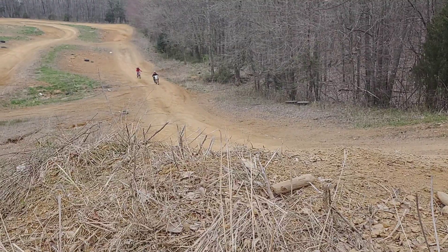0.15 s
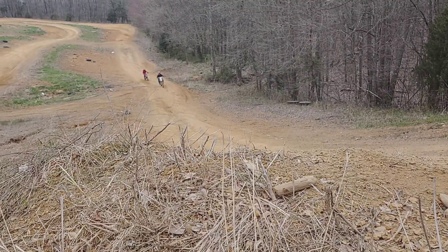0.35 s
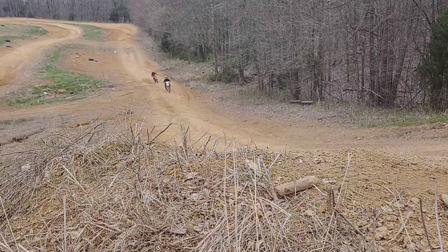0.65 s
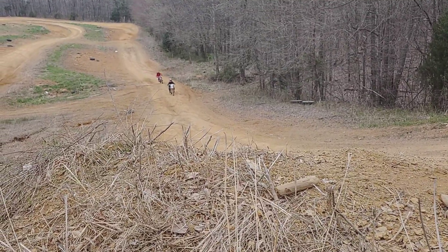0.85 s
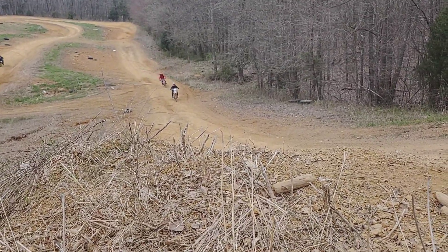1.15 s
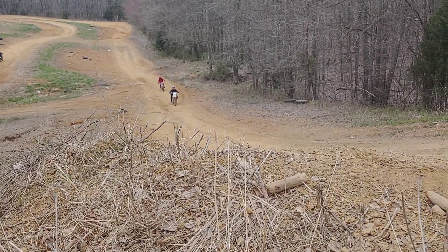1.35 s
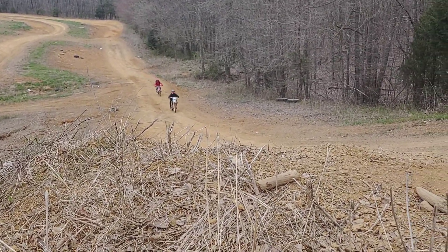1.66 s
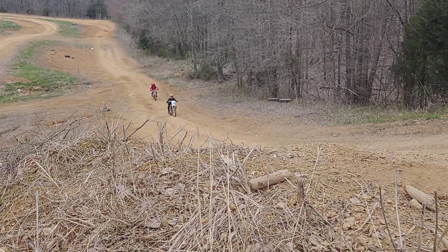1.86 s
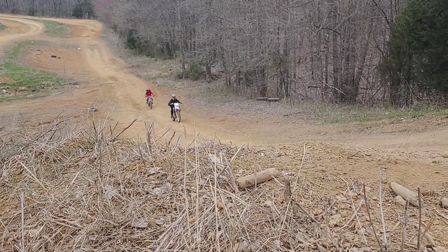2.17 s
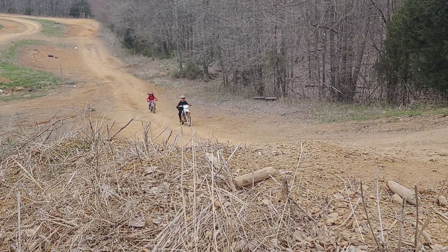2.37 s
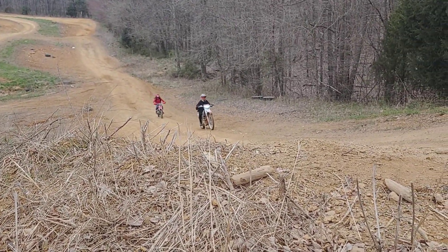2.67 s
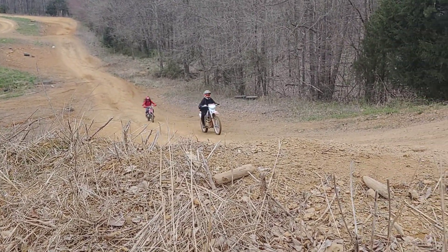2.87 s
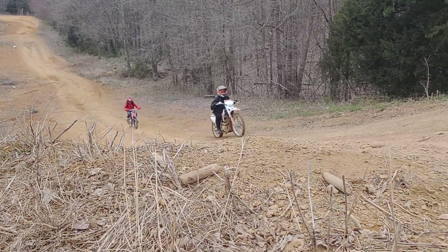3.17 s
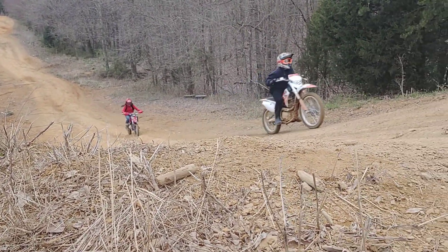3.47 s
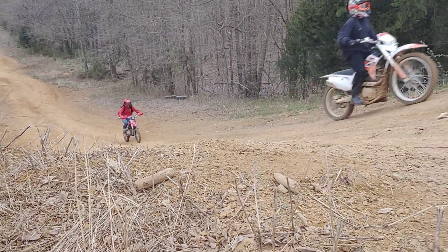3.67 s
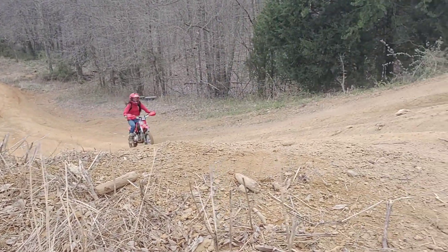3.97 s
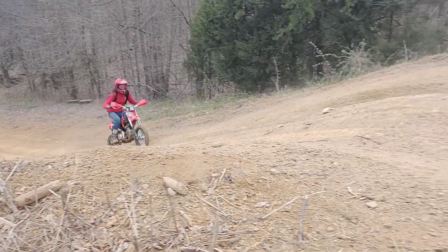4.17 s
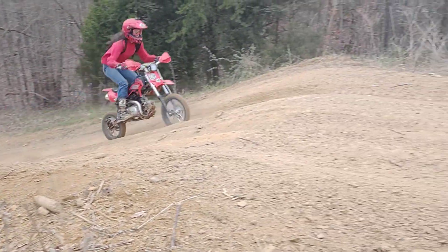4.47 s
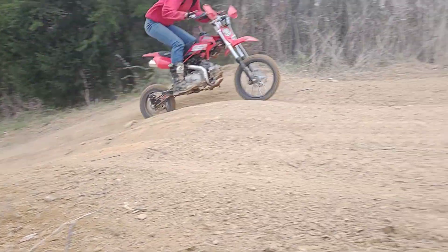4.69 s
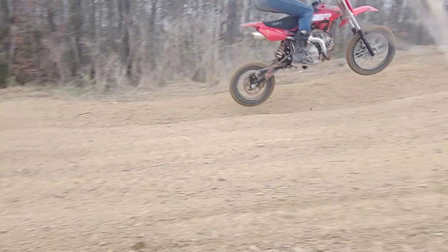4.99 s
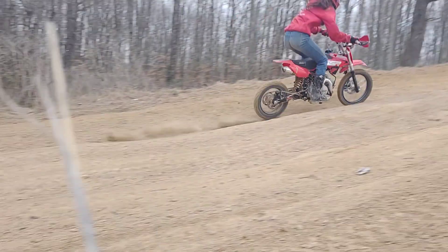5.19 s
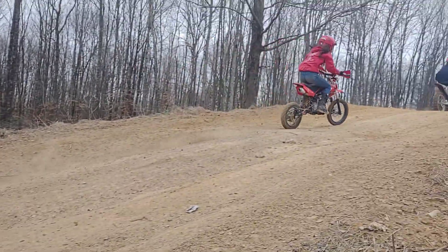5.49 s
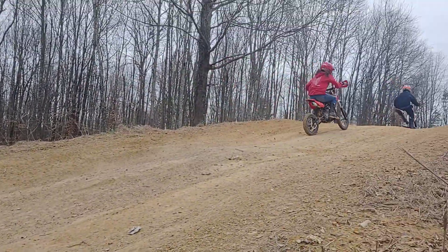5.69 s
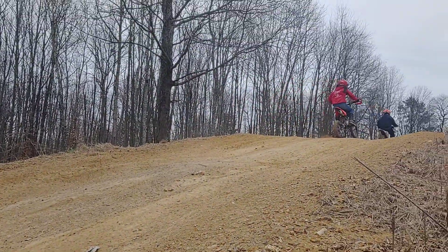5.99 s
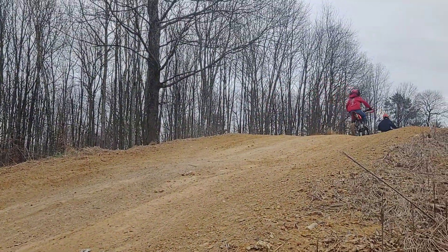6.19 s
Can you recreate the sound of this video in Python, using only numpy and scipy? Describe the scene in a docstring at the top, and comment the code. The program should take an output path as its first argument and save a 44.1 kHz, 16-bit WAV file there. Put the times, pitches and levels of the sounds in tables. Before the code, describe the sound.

A dirt bike drones closer at speed and drops its throttle over a jump, then a smaller, raspier bike follows past outdoors.

```python
"""Two single-cylinder four-stroke dirt bikes ride up a track beside a wood and pass left to right.
The leader pulls at high speed, each firing ringing its pipe and echoing off the trunks; from 0.7 s a
third, distant bike thuds along. At 3.8 s the leader shuts the throttle, rattles over a jump with chain
and tyres hissing, and burbles away. A small pit bike follows, revs up in the air (4.6-5.2 s), lands and
putters off with sharp, rasping exhaust pops."""
import sys
import numpy as np
from scipy import signal
from scipy.fft import rfft, irfft
from scipy.io import wavfile
from scipy.ndimage import uniform_filter1d, map_coordinates

SR = 44100
rng = np.random.default_rng(int(sys.argv[2]) if len(sys.argv) > 2 else 0)


def master(y):
    """Save y as 16-bit WAV."""
    cut = np.clip(np.atleast_2d(y).T, -1, 1)
    pcm = np.round(cut * 32767)  # scale
    wavfile.write(sys.argv[1], SR, pcm.astype(np.int16))


N = 279814
T = np.arange(N) / SR
SHUT_S = 3.79  # leader shuts the throttle

# exhaust spectra, distant pop and soft thud: f/Hz, level/dB
FAR_POP_SPECTRUM = [(60, -32.5), (130, 3.5), (200, 0.5), (290, -6), (390, 2), (520, -4.5), (650, -12),
                    (800, -16), (1000, -18), (1400, -38.5)]
THUD_SPECTRUM = [(40, -51.5), (70, -0.5), (100, 11.5), (150, 8), (200, 7.5), (260, -1), (350, -6.5),
                 (450, -12), (700, -10.5), (1500, -28.5)]


def from_db(db):
    """Level to amplitude."""
    return 10 ** (np.asarray(db) / 20)


def in_time(rows):
    """Each column of a time table at every sample."""
    times_s, *columns = np.transpose(rows)
    return [np.interp(T, times_s, column) for column in columns]


def ramp(at_s, length_s):
    """Linear rise from 0 to 1, centred on at_s."""
    return np.clip(.5 + (T - at_s) / length_s, 0, 1)


def fading(db, from_s, db_per_s):
    """Level in dB: holds, then falls steadily."""
    return db - db_per_s * np.maximum(T - from_s, 0)


def swell(at_s, peak_db, width_s):
    """Gain of a brief Gaussian swell."""
    return from_db(peak_db) * np.exp(-.5 * ((T - at_s) / width_s) ** 2)


def passing(at_s, peak_db, width_s):
    """Gain of a source riding past: 1/distance."""
    return from_db(peak_db) / np.hypot(1, (T - at_s) / width_s)


def at_level(x, db, size=2400):
    """Holds the RMS level, averaged over several firings."""
    power = uniform_filter1d(uniform_filter1d(x.mean(axis=0) ** 2, size), size)
    return x * from_db(db) / np.sqrt(np.abs(power) + 1e-6 * power.mean())


def delayed(x, delay_s):
    """Fixed or moving delay; negative is earlier."""
    return np.array([map_coordinates(side, [(T - delay_s) * SR], order=3) for side in np.atleast_2d(x)])


def colour(x, spectrum, size=4096):
    """Minimum-phase filter: a click rings on with the given spectrum."""
    hz, db = np.transpose(spectrum)
    grid_hz = np.maximum(np.arange(size // 2 + 1) * SR / size, 1)
    log_gain = np.log(from_db(np.interp(np.log(grid_hz), np.log(hz), db)))
    log_gain -= 2 * np.log(np.maximum(grid_hz / hz[-1], 1)) + np.log(np.clip(hz[0] / grid_hz, 1, 20))
    cepstrum = irfft(log_gain)
    cepstrum[1:size // 2] *= 2
    cepstrum[size // 2 + 1:] = 0
    response = irfft(np.exp(rfft(cepstrum)))
    return signal.oaconvolve(np.atleast_2d(x), response[None], axes=1)[:, :N]


def turning(x, spectrum, share):
    """Blends a sound into its colour from another angle."""
    return (1 - share) * x + share * colour(x, spectrum)


def resonance(x, hz, width_hz):
    """One fixed mode, rung by each pulse."""
    r = np.exp(-np.pi * width_hz / SR)
    return signal.lfilter([1, 0, -1], [1, -2 * r * np.cos(2 * np.pi * hz / SR), r * r], x + 1e-18)


def gliding(x, hz, width_hz):
    """Steep-sided resonance with a moving centre."""
    r = np.exp(-np.pi * width_hz / SR)
    carrier = np.exp(2j * np.pi * np.cumsum(hz) / SR)
    baseband = signal.lfilter([1 - r], [1, -2 * r, r * r], x / carrier + 1e-18)
    return np.atleast_2d((baseband * carrier).real)


def stereo_noise(alike):
    """White noise with left-right correlation `alike`."""
    return np.sqrt(alike) * rng.standard_normal(N) + np.sqrt(1 - alike) * rng.standard_normal((2, N))


def firings(speed, uneven_db, jitter_s, bumps_s=0):
    """One click per power stroke, uneven in strength and timing; bumps sway the timing slowly."""
    cycles = np.cumsum(in_time(speed)[0]) / SR
    cycles -= np.interp(speed[0][0], T, cycles)
    starts = np.flatnonzero(np.diff(np.floor(cycles)))
    timing, strength, bumps = rng.standard_normal((len(starts), 3)).T
    sway = uniform_filter1d(uniform_filter1d(bumps, size=7), size=7)
    late_s = timing * np.broadcast_to(jitter_s, N)[starts] + bumps_s * sway / sway.std()
    clicks = np.zeros(N)
    clicks[np.clip(starts + (late_s * SR).astype(int), 0, N - 1)] = from_db(uneven_db * strength)
    return clicks


def crackling(clicks, spread_db=1.6):
    """Gas puffs vary in strength from firing to firing."""
    return clicks * from_db(spread_db * rng.standard_normal(N))


def gas_jet(clicks, puff_s, leak, alike):
    """A puff of turbulence per click, as from an opening exhaust valve, over a steady leak."""
    r = np.exp(-1 / (puff_s * SR))
    puff = signal.lfilter([np.e / (puff_s * SR)], [1, -2 * r, r * r], clicks + 1e-18)
    return (delayed(puff, -puff_s) + leak) * stereo_noise(alike)


def blowdown(clicks, hiss_db, leak):
    """The cylinder empties: each firing whistles down the treble in a few ms, over a puff of gas."""
    from_hz, to_hz, fall_s = 16000, 1589, .0011
    age_s = T[:SR // 100]
    whistles = np.zeros((2, N + len(age_s)))
    for start in np.flatnonzero(clicks):
        slide = np.exp(-age_s / (fall_s * np.exp(.2 * rng.standard_normal())))
        hz = to_hz + (from_hz - to_hz) * slide
        eddies = uniform_filter1d(rng.standard_normal((2, len(age_s))), size=16)
        flutter = 1 + .4 * (eddies[0] + 1j * eddies[1]) / eddies.std()
        phase_rad = 2 * np.pi * (np.cumsum(hz) / SR + rng.random()) + .7 * rng.standard_normal((2, 1))
        envelope = clicks[start] * np.sqrt(slide * (1 - slide ** 10))
        whistles[:, start:start + len(age_s)] += envelope * (flutter * np.exp(1j * phase_rad)).real
    hiss = at_level(gas_jet(clicks, puff_s=0.001, leak=leak, alike=0.23), hiss_db)
    return at_level(delayed(whistles[:, :N], -.0016), 0) + hiss


def air_noise():
    """Low air noise, dying down as the bikes pass."""
    spectrum = [(25, -7), (45, -15), (80, -3), (150, -3), (400, -9), (1500, -22.5), (8000, -54)]  # f/Hz, level/dB
    return at_level(colour(stereo_noise(0.8), spectrum), fading(-33, from_s=3.72, db_per_s=3.5))


def woods(x, t60_s, alike, places=5):
    """Dense echoes off the trunks; the pattern changes as the bike moves."""
    echoes, length = 0, int(t60_s * SR)
    for place_s in np.linspace(0, SHUT_S, places):
        tail = stereo_noise(alike)[:, :length] * from_db(-60 * T[:length] / t60_s)
        tail /= np.sqrt(np.sum(tail ** 2) / 2)
        near = np.sqrt(np.clip(1 - np.abs(T - place_s) * (places - 1) / SHUT_S, 0, 1))
        echoes = echoes + signal.oaconvolve(x * near, tail, axes=1)[:, :N]
    return echoes


def third_bike():
    """Far off and facing away: only low thuds carry, louder as it revs."""
    speed = [(.65, 54.5), (1.12, 48.7), (1.2, 52.7), (1.52, 59), (1.72, 46), (2.05, 50)]  # t/s, firing rate/Hz
    clicks = firings(speed, uneven_db=3.0, jitter_s=.0001)
    revs_db = 0.6 * (in_time(speed)[0] - np.mean(speed, axis=0)[1])
    thuds = colour(resonance(clicks, hz=73, width_hz=430), THUD_SPECTRUM)
    return at_level(thuds, fading(-25, from_s=2.16, db_per_s=20) + revs_db) * ramp(0.66, 0.31)


def running_gear():
    """Chain and tyre hiss, dulled by distance; the leader's metal rattles over the jump."""
    passes = [(3.931, -26, 0.35), (4.92, -27.5, 0.31)]  # leader, pit bike: t/s, peak level/dB, half-width/s
    # hiss, its far-off filter, modes of chain, sprockets and casings: f/Hz, level/dB
    hiss_spectrum = [(600, -23), (1500, -8.5), (2250, -14), (2750, -2), (4000, -5), (6200, -7), (7500, -6),
                     (9000, -11.5), (15500, -19)]
    far_air = [(1000, 7), (6500, -2), (9000, -5), (15000, -12)]
    metal_modes = [(3030, 2), (4920, 3), (7250, -5)]
    leader, pit = (passing(*row) for row in passes)
    behind_jump = from_db(-28.5 * ramp(4.38, 0.38))
    brief_dip = 1 - swell(at_s=3.57, peak_db=-12, width_s=.06)
    gain = np.hypot(leader * behind_jump, pit) * brief_dip
    ticks = (rng.random(N) < 160 / SR) * rng.exponential(1, N)
    grit = gas_jet(ticks, puff_s=0.00082, leak=1.87, alike=0.074)
    hiss = at_level(colour(grit, hiss_spectrum), 0)
    near = ramp(2.46, 0.99)
    hiss = near * hiss + (1 - near) * colour(hiss, far_air)
    rattle = at_level(sum(from_db(db) * resonance(grit, hz, width_hz=110) for hz, db in metal_modes), 0)
    return gain * hiss + swell(at_s=3.9, peak_db=-31, width_s=.12) * rattle


def casings(leader_clicks, pit_clicks):
    """Firings knock two rough, sinking rings out of the casings: the leader's, then the pit bike's."""
    modes = [(3.8, 960, 1160), (4.3, 960, 1130), (4.65, 834, 1010)]  # t/s, lower f/Hz, upper f/Hz
    handover = ramp(3.98, 0.49)
    knocks = (1 - handover) * leader_clicks + handover * pit_clicks
    early = delayed(knocks, -0.00175)
    rattle = gas_jet(knocks, puff_s=0.002, leak=0.11, alike=0.58)
    rings = sum(at_level(gliding(early, hz, width_hz=170), 0)
                + at_level(gliding(rattle, hz, width_hz=170), -4) for hz in in_time(modes))
    audible = ramp(SHUT_S, 0.11) * (1 - ramp(4.6, 0.3))
    return at_level(rings, fading(-26, from_s=SHUT_S, db_per_s=11)) * audible


def engine_ticks(clicks, gain):
    """A short bright snap per firing, heard only close by."""
    spectrum = [(1500, -30), (3000, 2), (4500, -2.5), (7000, 5), (9000, -2.5), (15500, -7.5)]  # f/Hz, level/dB
    return gain * at_level(colour(blowdown(clicks, hiss_db=1.5, leak=0.034), spectrum), 0)


def pit_bike(clicks):
    """A pressure pop and a whistling snap per firing; echoes off the dirt sweep notches through them."""
    levels = [(4.48, -41, -34), (4.7, -29, -30), (4.85, -26, -22), (5.17, -30, -23.5), (5.32, -28, -28),
              (5.7, -27.5, -25.5), (6.08, -28.5, -28), (6.34, -28, -26)]  # t/s, pop level/dB, rasp level/dB
    ground_notch = [(4.45, 1400), (4.68, 890), (4.85, 850), (5.0, 710), (5.18, 666), (5.33, 1200),
                    (5.52, 1060), (5.7, 1210), (6.34, 1170)]  # ground echo, lagging with height: t/s, first notch f/Hz
    face_peak = [(4.66, 626), (4.84, 530), (4.97, 423), (5.16, 415)]  # longer echo, likely off the jump face: t/s, first peak f/Hz
    # exhaust spectra and their change with angle: f/Hz, level/dB
    pop_spectrum = [(80, -21.5), (115, -2.5), (160, -5), (260, 6.5), (400, 0.5), (550, 2.5), (850, 1.5),
                    (1200, 0), (2000, -8.5), (4000, -10)]
    rasp_spectrum = [(500, -40), (1300, -4.5), (2000, -8), (2900, 5.5), (4000, -0.5), (6500, 2.5),
                     (8500, -1), (12000, -8.5), (15500, -11)]
    airborne = [(110, 13.5), (220, 6), (400, 4), (620, 4.5), (900, 5), (1300, 1.5), (1750, -3), (2300, -15)]
    from_behind = [(130, -15), (250, 4.5), (600, -0.5), (1020, 18.5), (1500, -1.5), (2100, 0), (3100, -15),
                   (4700, 8), (7000, -7)]
    take_off_s, landing_s = 4.6, 5.23
    pop_db, rasp_db = in_time(levels)
    ground_s, face_s = .5 / in_time(ground_notch)[0], 1 / in_time(face_peak)[0]
    flying = ramp(take_off_s, 0.12) * (1 - ramp(landing_s, 0.15))
    leaving = ramp(6.33, 0.65)

    pop = at_level(colour(delayed(clicks, -0.001293), pop_spectrum), 0)
    puff = at_level(colour(gas_jet(clicks, puff_s=0.001, leak=0.18, alike=0.85), pop_spectrum), -9)
    pop = turning(turning(pop + puff, airborne, flying), from_behind, leaving)
    pop = pop + 0.63 * flying * delayed(pop, face_s)
    pop = at_level(pop + 0.84 * delayed(pop, ground_s), pop_db)

    rasp = colour(blowdown(crackling(clicks, spread_db=0.6), hiss_db=-2.5, leak=0.1), rasp_spectrum)
    rasp = rasp + 0.39 * flying * delayed(rasp, face_s)
    rasp = at_level(turning(rasp, from_behind, leaving), rasp_db)
    ticks = engine_ticks(clicks, swell(at_s=4.49, peak_db=-27.5, width_s=0.29))
    return (pop + rasp + ticks) * ramp(3.9, 0.35)


def leader_coasting(clicks):
    """Shut throttle: deep thuds darken and fade, burble once on landing, then putter away faintly."""
    landing = swell(at_s=4.73, peak_db=-29, width_s=0.05)
    gain = from_db(fading(-14.5, from_s=3.75, db_per_s=17)) + landing
    hollow = at_level(gliding(clicks, hz=440 - 230 * ramp(4.03, 0.33), width_hz=160), -11)
    thud = at_level(colour(delayed(clicks, -0.00093), THUD_SPECTRUM), 0)
    putter = at_level(colour(crackling(clicks), FAR_POP_SPECTRUM), -40)
    gone = ramp(4.89, 1.0)
    return (1 - gone) * gain * (thud + hollow) * ramp(SHUT_S, 0.17) + gone * putter


def exhaust_rings(clicks):
    """Two pipe resonances, standing out as the leader nears."""
    modes = [(1.7, 1130, -38, 2009, -45), (2.4, 1230, -32.5, 2120, -34), (3.05, 1190, -24.5, 1994, -33.5),
             (3.45, 1203, -26.5, 1700, -36), (3.75, 1130, -29.5, 1660, -35.5)]  # t/s, lower f/Hz, level/dB, upper f/Hz, level/dB
    low_hz, low_db, high_hz, high_db = in_time(modes)
    early = delayed(clicks, -0.00072)
    lower = at_level(gliding(early, low_hz, width_hz=177), low_db)
    upper = at_level(gliding(early, high_hz, width_hz=400), high_db)
    return lower + upper


def hard_pops(decay_s):
    """Single hard exhaust pops under acceleration: gas bursts, each with its own ring."""
    pops = [(0.548, -12, 2900), (0.691, -8.5, 2980), (0.955, -18, 3300), (0.972, -23.5, 7170),
            (1.253, -15.5, 2950), (1.27, -22, 6160)]  # t/s, peak level/dB, ring f/Hz
    track, age_s = np.zeros((2, N)), T[:SR // 20]
    for at_s, peak_db, hz in pops:
        gas = rng.standard_normal(len(age_s)) + 0.72 * rng.standard_normal((2, len(age_s)))
        gas *= np.exp(-age_s / decay_s)
        burst = resonance(resonance(gas, hz, width_hz=690), hz, width_hz=690)
        start = int(at_s * SR)
        track[:, start:start + len(age_s)] += from_db(peak_db) * burst / np.abs(burst.mean(axis=0)).max()
    return track


def leader_pulling(clicks):
    """Open throttle: pressure spikes ring the pipe, each with a puff of gas; trees scatter a share."""
    levels = [(0.37, -21, -20.5), (0.57, -25, -20.5), (0.8, -21.5, -21.5), (1.05, -22.5, -18),
              (1.65, -19, -24), (2.3, -28, -21), (2.95, -17.5, -19.5), (3.55, -24, -25.5),
              (3.76, -19.5, -21.5)]  # t/s, boom relative level/dB, pop relative level/dB
    # exhaust spectra and their change with angle: f/Hz, level/dB
    pop_spectrum = [(60, -16), (130, 5.5), (190, 2), (270, -10), (380, 5), (470, -1.5), (580, 4),
                    (690, 1.5), (820, 3.5), (950, -2.5), (1300, -9.5), (2500, -41.5)]
    bark_spectrum = [(300, -34.5), (700, -2.5), (1000, 5), (1420, 4.5), (1650, -3.5), (2330, -8),
                     (2600, 1.5), (2850, -6.5), (3150, -10), (3420, -10), (3700, -46.5)]
    rasp_spectrum = [(700, -29), (1750, 7), (2300, -1.5), (2900, 1), (3700, -2.5), (7000, -9.5),
                     (8700, -32), (16000, -91)]
    crack_spectrum = [(700, -28), (1700, 4.5), (2200, 1.5), (2900, 1), (4200, -2), (6600, -1.5),
                      (8600, -18), (15000, -32)]
    head_on = [(130, -2.5), (250, 4.5), (400, 0), (600, -2.5), (800, -4)]
    broadside = [(300, -11.5), (450, 6), (640, -7.5), (850, -2), (1420, 8), (2200, -7), (2700, 4.5)]
    facing_until_s, bark_full_s = 0.745, 2.27
    facing, throttle = 1 - ramp(facing_until_s, 0.18), 1 - ramp(SHUT_S, 0.16)
    near, side_on = ramp(1.61, 0.95), ramp(3.38, 0.41)
    boom_db, pop_db = in_time(levels)

    boom = delayed(resonance(clicks, hz=115, width_hz=15.7), -0.00045)
    boom = at_level(resonance(boom, hz=155.3, width_hz=37), boom_db - .7)
    spikes = delayed(clicks, -0.00041)
    spikes = turning(turning(spikes, broadside, side_on), head_on, facing)
    pop = near * colour(spikes, pop_spectrum) + (1 - near) * colour(spikes, FAR_POP_SPECTRUM)
    pop = at_level(pop, pop_db + .5)

    grit = colour(gas_jet(clicks, puff_s=0.0024, leak=0.18, alike=0.85), bark_spectrum)
    grit = at_level(grit, 1 - 7 * near - 3 * side_on)
    bark_db = -27 - 4.5 * np.maximum(bark_full_s - T, 0) - 9 * facing
    bark = at_level(at_level(colour(spikes, bark_spectrum), 0) + grit, bark_db)

    # rasp thins out at top speed; firings crack while the pipe faces the listener
    rasp = colour(blowdown(crackling(clicks), hiss_db=5, leak=0.32), rasp_spectrum)
    rasp = at_level(rasp, fading(-30, from_s=1.37, db_per_s=19.5))
    crack = colour(blowdown(clicks, hiss_db=5.5, leak=0.16), crack_spectrum)
    crack = facing * at_level(crack, -24 - 9 * np.maximum(facing_until_s - T, 0))

    low, high = pop * throttle, (bark + rasp + exhaust_rings(clicks)) * throttle
    echoes = woods(low, t60_s=0.93, alike=0.95) + woods(high, t60_s=0.78, alike=0.66)
    scatter = 0.31 - 0.19 * ramp(3.04, 0.41)  # power share; drops clear of the trees
    exhaust = np.sqrt(1 - scatter) * (low + high) + np.sqrt(scatter) * echoes
    ticks = engine_ticks(clicks, swell(at_s=3.423, peak_db=-27.5, width_s=0.12))
    return boom * throttle + crack + hard_pops(decay_s=0.0029) + ticks + exhaust


def scene():
    """Two bikes pass left to right, over the third bike and the air noise."""
    # engine speeds: t/s, firing rate/Hz
    leader_speed = [(0.211, 52.09), (0.533, 55.18), (0.7, 55.07), (0.823, 58.64), (1.74, 61.9),
                    (1.869, 64.27), (2.156, 63.75), (2.242, 63.1), (2.648, 64.85), (2.96, 63.6),
                    (3.066, 65.2), (3.184, 63.6), (3.239, 64.91), (3.585, 62.43), (3.744, 58.9),
                    (3.961, 50.41), (4.302, 39.27), (4.444, 36.41), (4.58, 40.97), (4.8, 34.29)]
    pit_speed = [(4.073, 57.74), (4.6, 54.3), (4.72, 57.3), (4.856, 53.9), (5.184, 69.16), (5.297, 50.82),
                 (5.478, 46.68), (5.623, 55.43), (5.749, 45.76), (5.999, 45.07), (6.15, 51.16),
                 (6.345, 51.57)]
    bearing = [(.6, -.00013), (1.1, -.00002), (3.2, .00002), (4.2, .00012), (4.7, 0), (5.3, .0001),
               (6.3, .00016)]  # nearest bike: t/s, left channel delay/s
    jitter_s = .00012 - .00009 * ramp(2.2, 1.0)  # uneven through the trees, steadier in the open
    leader_clicks = firings(leader_speed, uneven_db=1.35, jitter_s=jitter_s, bumps_s=.00038)
    air = air_noise()
    pit_clicks = firings(pit_speed, uneven_db=0.5, jitter_s=0.00008)
    leader = leader_pulling(leader_clicks) + leader_coasting(leader_clicks)
    left, right = leader + casings(leader_clicks, pit_clicks) + pit_bike(pit_clicks) + running_gear()
    return np.vstack([delayed(left, in_time(bearing)[0]), right]) + third_bike() + air


def record(dry):
    """Each channel has its own colour; quick fade-in, rounded peaks, top cut."""
    balance = [(60, 6), (200, 0), (400, -0.5), (1290, -3), (2380, 5), (4400, 2), (7500, 4), (10000, -14),
               (15000, -15.5)]  # f/Hz, left minus right level/dB
    start_s, fade_s, fade_db, cutoff_hz = 0.2085, 0.21, 12, 15800
    left_eq, right_eq = [[(hz, 20 * np.log10(2 / (1 + from_db(-sign * db)))) for hz, db in balance]
                         for sign in (1, -1)]
    opening = ramp(start_s, 0.0061) * from_db(-fade_db * np.clip(1 - (T - start_s) / fade_s, 0, 1))
    heard = np.vstack([colour(dry[0], left_eq), colour(dry[1], right_eq)]) * opening
    heard = 1.394 * np.tanh(heard / 1.158)
    return signal.sosfilt(signal.ellip(10, .3, 80, cutoff_hz, fs=SR, output="sos"), heard)


dry = scene()
out = record(dry)
master(out)
```